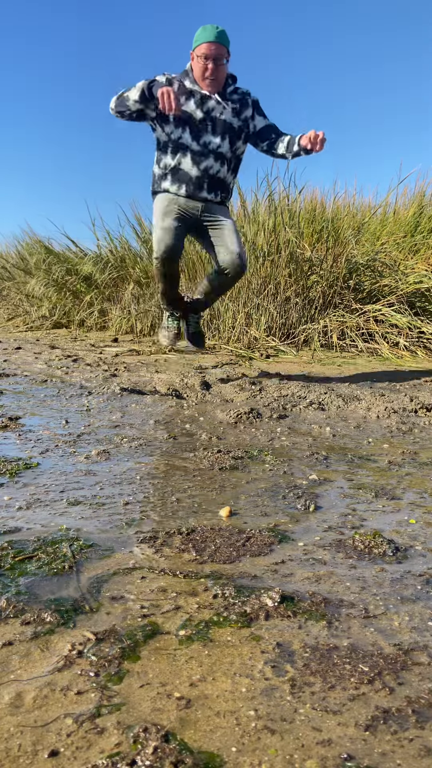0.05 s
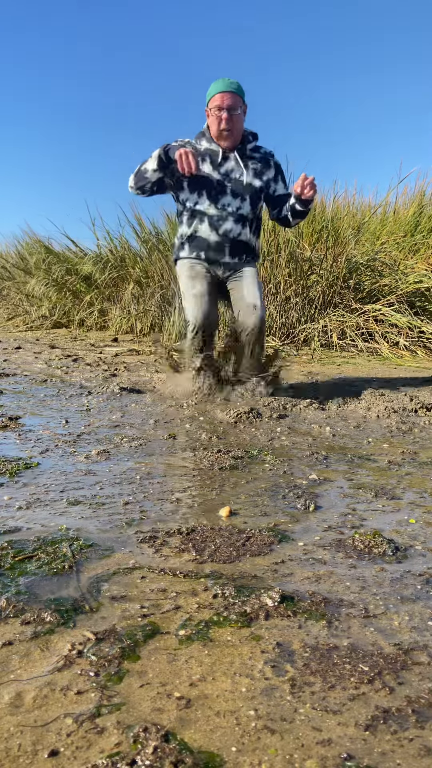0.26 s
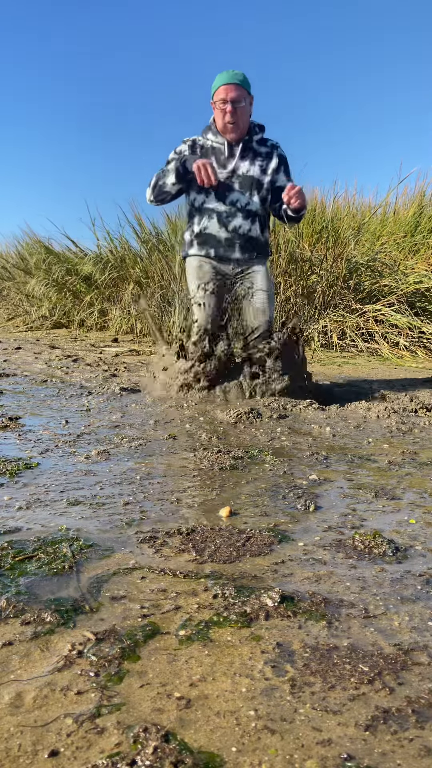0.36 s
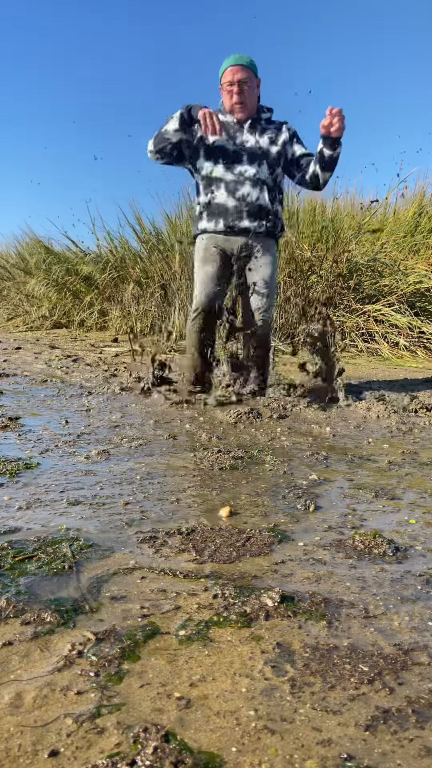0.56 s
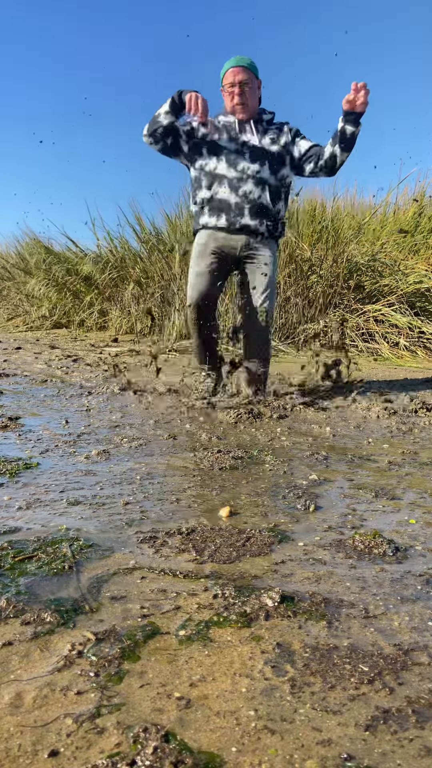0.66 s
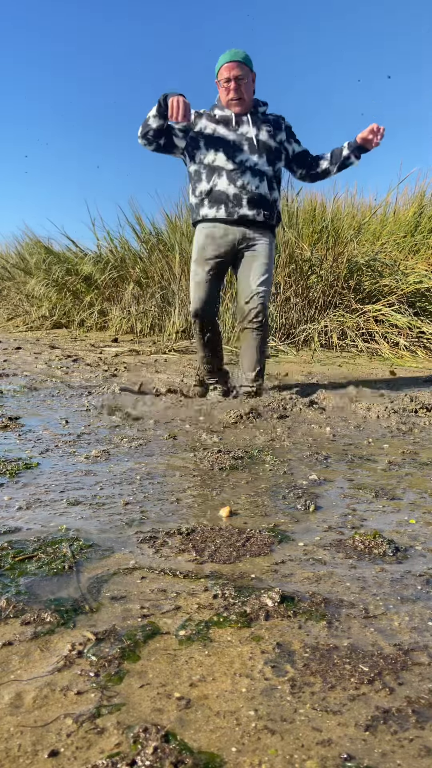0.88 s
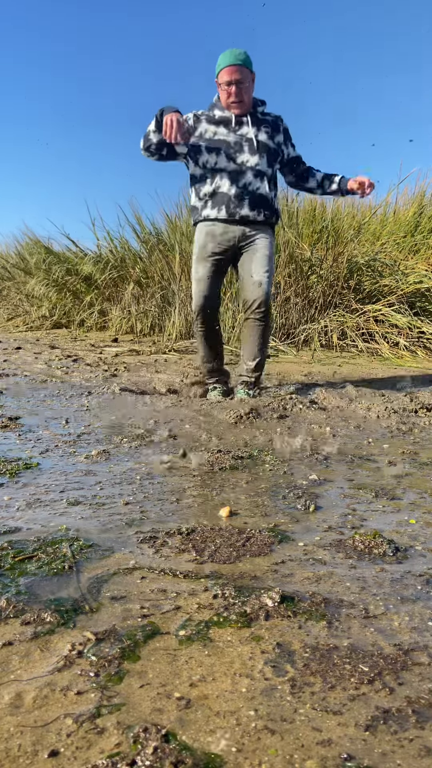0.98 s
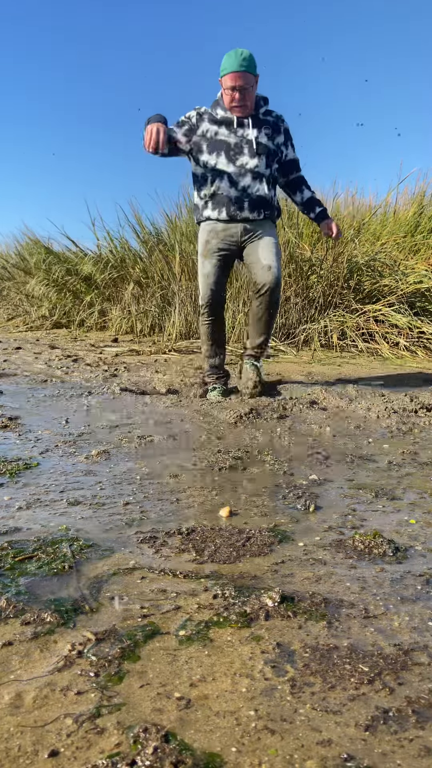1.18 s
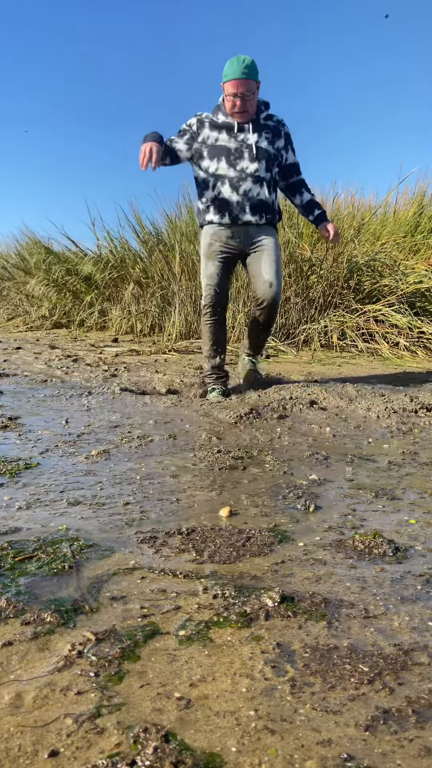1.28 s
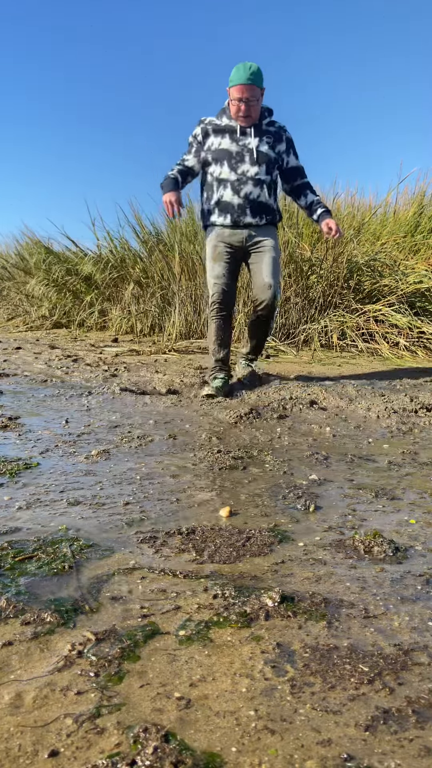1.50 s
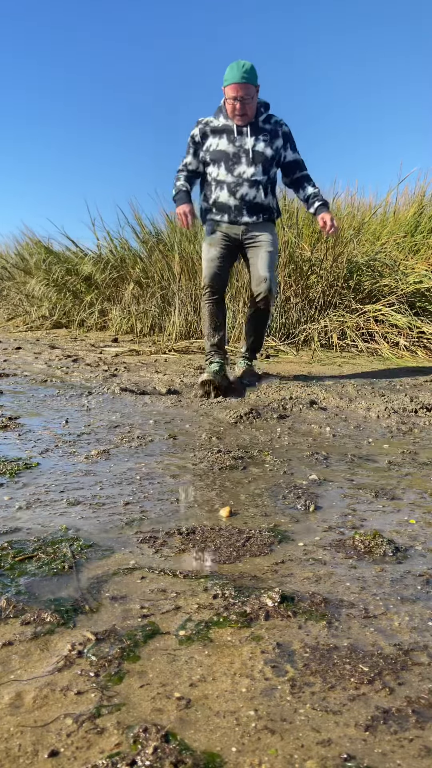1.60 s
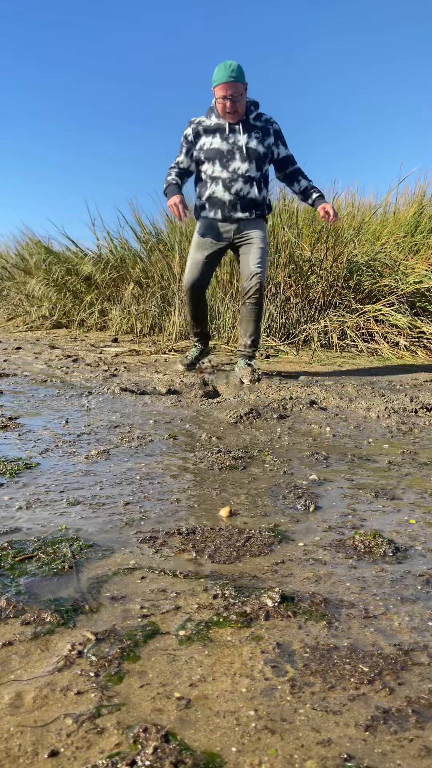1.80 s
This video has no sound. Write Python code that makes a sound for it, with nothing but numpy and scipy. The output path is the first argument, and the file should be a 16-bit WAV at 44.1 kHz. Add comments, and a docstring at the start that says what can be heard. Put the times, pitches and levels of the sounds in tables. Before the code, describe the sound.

Feet slap hard into wet mud, followed by faint spatter and squelching steps.

```python
"""Two feet slap into wet shore mud: a man's jump, a few metres from the microphone.
Each sole cracks the water film, bursts an air pocket and thuds; mud sprays, the soft ground quakes.
Clods and drops patter down, bubbles ring, then the shoes squelch as he pulls free and steps about.
Light wind rumbles on the microphone over the hush of the shore."""
import sys
import numpy as np
from scipy import signal
from scipy.fft import rfft, irfft
from scipy.io import wavfile
from scipy.ndimage import uniform_filter1d

SR = 44100
rng = np.random.default_rng(int(sys.argv[2]) if len(sys.argv) > 2 else 0)


def dump_mix(stems):
    """Bounce the given channels to the path in sys.argv[1] as a 16-bit WAV at rate SR."""
    frames = np.atleast_2d(stems).T  # one column per channel
    limited = np.clip(frames, -1, 1)  # hard clip at full scale
    pcm = np.round(limited * 32767).astype(np.int16)
    wavfile.write(sys.argv[1], SR, pcm)


N = 81585
TIME_S = np.arange(N) / SR

# foot impacts: start_s, crack_db, pocket_delay_s, pocket_rise_s, pocket_db, splash_db
FEET = [(0.2141, -9.5, 0.00163, 0.001, -4, -16.5), (0.2217, -24.5, 0.004376, 0.001, -3.5, -16.5)]
# air pocket under a sole: pitch_hz, relative_db, t60_s
POCKET_MODES = [(379, 0, 0.022), (662, -4.5, 0.013), (1050, -11, 0.0069), (1360, -10.5, 0.01)]
# water film crack, splash, sprayed mud: freq_hz, relative_db
CRACK_SPECTRUM = [(300, -14.5), (1500, 5.5), (2900, 0.5), (4500, -11), (6600, -9), (9200, -25),
                  (10500, -45.5)]
SPLASH_SPECTRUM = [(100, -34.5), (500, 6.5), (1400, -3.5), (2000, -11.5), (2500, -8.5), (3400, -12.5),
                   (7000, -30.5), (9200, -27.5), (10500, -61)]
SPRAY_SPECTRUM = [(100, 2), (450, -6), (800, -14), (1400, -7.5), (2700, -13), (4500, -23), (6700, -19),
                  (9300, -34), (10400, -53)]
# mud sprayed by the landing: time_s, level_db
SPRAY_LEVEL = [(.2, -60), (.213, -42), (.218, -20.5), (.236, -35), (.26, -35), (.29, -43), (.345, -44),
               (.385, -58.5), (.46, -79)]
# ground wobble: time_s, pitch_hz, level_db
QUAKE_TRACK = [(0.249, 45.5, -30.5), (0.288, 43.3, -24.5), (0.31, 49.8, -13.5), (0.337, 41.6, -24),
               (0.361, 54, -16.5), (0.381, 62.8, -33.5), (.5, 62, -46)]

# falling clods: start_s, pitch_hz, plop_db, splat_db
CLODS = [(.509, 1310, -44.5, -50), (0.5639, 1557, -34.5, -38), (0.617, 1300, -46, -41),
         (0.6266, 1300, -34.5, -45.5), (0.6715, 880, -38.5, -45), (0.784, 1453, -39.5, -47),
         (0.7908, 965, -45.5, -39.5)]
# bubbles in the mud: start_s, pitch_hz, level_db
BUBBLES = [(.009, 393, -40.5), (.01, 915, -49), (.26, 467, -35), (0.751, 1340, -45), (.757, 940, -45),
           (.764, 447, -37.5), (0.805, 965, -43.5), (0.8233, 1018, -43.5), (.834, 968, -43.5),
           (.978, 386, -45.5), (1.4338, 596, -46), (1.475, 619, -44.5)]
# single drops: start_s, level_db
DROPS = [(.347, -45), (0.4415, -39), (.554, -45), (0.7244, -47), (0.766, -40), (0.8189, -40),
         (0.8454, -40.5), (0.876, -40), (1.004, -46.5), (1.05, -48.5), (1.076, -47), (1.141, -51.5),
         (1.292, -46)]
# drop impact: freq_hz, relative_db
DROP_SPECTRUM = [(500, 7), (1800, 5.5), (2800, 8), (4500, -2), (6600, -0.5), (9200, -5.5), (10500, -21.5),
                 (12500, -26)]
# fine spatter: time_s, level_db
PATTER_LEVEL = [(0, -90.5), (.128, -58.5), (.17, -68), (.42, -64.5), (.61, -55.5), (.72, -56.5), (.8, -52),
                (.92, -58), (1.06, -58.5), (1.19, -70), (1.3, -54.5), (1.5, -78)]

# shoe suction: start_s, rise_s, decay_s, pitch_hz, cavity_db, crackle_db
SQUELCHES = [(0.763, 0.007, 0.011, 794, -42, -38.5), (1.275, 0.01, 0.014, 568, -44, -41.5),
             (1.328, 0.031, 0.035, 497, -63.5, -50), (1.4078, 0.0015, 0.0036, 553, -46.5, -47),
             (1.442, 0.02, 0.012, 750, -43.5, -45.5), (1.521, 0.0037, 0.012, 522, -43, -81),
             (1.6775, 0.00074, 0.0012, 910, -43.5, -42)]
# wet crackle, oozing mud: freq_hz, relative_db
CRACKLE_SPECTRUM = [(200, -18), (500, -2.5), (1400, 7.5), (3300, 1), (4300, -18.5), (6600, -18),
                    (10500, -59)]
OOZE_SPECTRUM = [(100, -4), (300, 3.5), (480, 5.5), (800, -6), (1400, -3.5), (1900, -10.5), (2500, -6),
                 (3300, -17.5), (7000, -30.5), (10500, -43)]
# ooze round the shoes: time_s, level_db
OOZE_LEVEL = [(0, -56.5), (.14, -51), (.19, -75), (.5, -48.5), (.73, -63.5), (.79, -47.5), (.88, -52),
              (1.15, -56.5), (1.33, -55), (1.66, -57.5), (1.85, -68)]

# wind gusts, shore hush: time_s, level_db
WIND_LEVEL = [(.08, -42), (.18, -45), (.66, -41.5), (.75, -47.5), (.86, -42), (.95, -44.5), (1.05, -38),
              (1.2, -52), (1.27, -43), (1.35, -47.5), (1.85, -46.5)]
HUSH_LEVEL = [(.18, -58.5), (.6, -58), (1.3, -56.5), (1.85, -63)]
# wind rumble, shore hush: freq_hz, relative_db
WIND_SPECTRUM = [(15, -47.5), (35, -12.5), (58, 5), (85, -2.5), (200, -18.5), (1000, -69.5)]
HUSH_SPECTRUM = [(280, 1.5), (500, -3), (2500, -20.5), (3200, -29.5), (4000, -32.5), (7500, -20.5),
                 (11000, -48)]
# microphone pair balance: freq_hz, left_minus_right_db
MIC_BALANCE = [(100, 1), (300, 3), (750, 3), (1100, 3), (1650, 15), (2000, 0), (2500, 0.5), (3600, -7),
               (5500, 2), (8300, -10)]
# microphone pair phase: freq_hz, left_lead_rad
MIC_PHASE = [(0, 1.5), (1550, -0.03), (1810, -4), (2150, -1.71), (3880, -2.5), (4130, -7), (5080, -8),
             (6030, -8.5), (7920, -1.5), (8960, -2.5), (10600, 1.7), (12700, 1.5)]

POCKET_SAG_RATIO, POCKET_SAG_S = 0.12, 0.0027  # pitch starts high, sinks as the pocket widens
THUD_HZ, THUD_DB, THUD_DECAY_S, THUD_LAG_S = 90.7, -20, 0.013, 0.0021
SMACK_RISE_S, PLOP_RISE_S, CAVITY_WIDTH_HZ = 0.00089, 0.002, 284


def landing():
    """Each sole cracks the water film, splashes, bursts an air pocket and thuds into the mud."""
    out = np.zeros(N)
    for start_s, crack_db, delay_s, rise_s, pocket_db, splash_db in FEET:
        out += amp(crack_db) * fizz(CRACK_SPECTRUM) * burst(start_s, 0.00031, 0.0017)
        out += amp(splash_db) * fizz(SPLASH_SPECTRUM) * burst(start_s, 0.0035, 0.0086)
        age_s = np.maximum(TIME_S - start_s - delay_s, 0)
        warped_s = age_s + POCKET_SAG_RATIO * POCKET_SAG_S * (1 - np.exp(-age_s / POCKET_SAG_S))
        for pitch_hz, mode_db, t60_s in POCKET_MODES:
            envelope = burst(start_s + delay_s, rise_s, t60_s / np.log(1000))
            out += amp(pocket_db + mode_db) * np.sin(2 * np.pi * pitch_hz * warped_s) * envelope
        thud_s = np.maximum(age_s - THUD_LAG_S, 0)
        out += amp(THUD_DB) * np.sin(2 * np.pi * THUD_HZ * thud_s) * np.exp(-thud_s / THUD_DECAY_S)
    return out


def spray():
    """Mud thrown out by the landing, as dense grains."""
    gate = (TIME_S > SPRAY_LEVEL[0][0]) & (TIME_S < SPRAY_LEVEL[-1][0])
    return grains(SPRAY_SPECTRUM, rate_per_s=9000) * level(SPRAY_LEVEL) * gate


def quake(fade_s=0.035):
    """Waterlogged ground wobbles after the landing."""
    time_s, pitch_hz, level_db = np.transpose(QUAKE_TRACK)
    cycles = np.cumsum(np.interp(TIME_S, time_s, pitch_hz) * (TIME_S > time_s[0])) / SR
    fade = np.clip((time_s[-1] - TIME_S) / fade_s, 0, 1)
    return amp(np.interp(TIME_S, time_s, level_db)) * np.sin(2 * np.pi * cycles) * fade


def patter(stray_per_s=140, stray_db=-3, ring_s=0.0005):
    """Fine spatter shed in the jump and raining back; larger stray drops ring at random pitches."""
    fine = grains(DROP_SPECTRUM, rate_per_s=1300)
    strays = np.zeros(N)
    for onset in np.flatnonzero(rng.random(N) < stray_per_s / SR):
        age_s = TIME_S[:min(1024, N - onset)]
        gain, pitch_hz = rng.uniform(0.37, 1), rng.uniform(1800, 10500)
        ring = np.sin(2 * np.pi * pitch_hz * age_s) * np.exp(-age_s / ring_s)
        strays[onset:onset + len(ring)] += gain * ring
    return (fine + amp(stray_db) * colour(strays, DROP_SPECTRUM)) * level(PATTER_LEVEL)


def drops(decay_s=0.0039):
    """Single drops smack the wet surface."""
    return sum(amp(level_db) * smack() * burst(start_s, SMACK_RISE_S, decay_s)
               for start_s, level_db in DROPS)


def clods(plop_decay_s=0.0044, splat_decay_s=0.0069):
    """Clods fall back, each with a rising plop and a splat."""
    out = np.zeros(N)
    for start_s, pitch_hz, plop_db, splat_db in CLODS:
        note = cavity_note(start_s, plop_decay_s, pitch_hz, glide_ratio=0.087)
        plop = (note + cavity_noise(pitch_hz, width_hz=400)) / np.sqrt(2)
        out += amp(plop_db) * plop * burst(start_s, PLOP_RISE_S, plop_decay_s)
        out += amp(splat_db) * smack() * burst(start_s, SMACK_RISE_S, splat_decay_s)
    return out


def bubbles(decay_cycles=5.9, rough_db=-5.5):
    """Bubbles ring in the churned mud: rough, slightly falling notes."""
    out = np.zeros(N)
    for start_s, pitch_hz, level_db in BUBBLES:
        decay_s = decay_cycles / pitch_hz
        note = cavity_note(start_s, decay_s, pitch_hz, glide_ratio=-0.04)
        rough = amp(rough_db) * cavity_noise(pitch_hz, CAVITY_WIDTH_HZ)
        out += amp(level_db) * (note + rough) * burst(start_s, PLOP_RISE_S, decay_s)
    return out


def squelches():
    """Mud oozes under the shoes; cavities crackle open as a foot lifts or sinks."""
    out = grains(OOZE_SPECTRUM, rate_per_s=2800) * level(OOZE_LEVEL)
    crackle = steady(grains(CRACKLE_SPECTRUM, rate_per_s=4000), window_samples=140)
    for start_s, rise_s, decay_s, pitch_hz, cavity_db, crackle_db in SQUELCHES:
        suction = amp(cavity_db) * cavity_noise(pitch_hz, CAVITY_WIDTH_HZ)
        out += (suction + amp(crackle_db) * crackle) * burst(start_s, rise_s, decay_s)
    return out


def wind():
    """Gusts rumble on both microphone ports, partly correlated."""
    shared = steady(colour(rng.standard_normal(N), WIND_SPECTRUM), window_samples=1800)
    per_port = steady(colour(rng.standard_normal((2, N)), WIND_SPECTRUM), window_samples=1800)
    return level(WIND_LEVEL) * (amp(-4.5) * shared + amp(-1.5) * per_port)


def shore_hush():
    """Faint stereo noise of the open shore."""
    return level(HUSH_LEVEL) * colour(rng.standard_normal((2, N)), HUSH_SPECTRUM)


def at_microphones(source, scatter_db=-14, highpass_hz=900):
    """Direct sound with its own colour and phase per port, plus scatter off ground and reeds."""
    freq_hz = np.fft.rfftfreq(2 * N, 1 / SR)
    balance = amp(log_interp(MIC_BALANCE, freq_hz))
    half_lead = np.exp(0.5j * log_interp(MIC_PHASE, freq_hz))
    ports = np.array([balance * half_lead, 1 / half_lead]) * np.sqrt(2 / (1 + balance ** 2))
    direct = irfft(rfft(source, 2 * N) * ports, 2 * N)[:, :N]
    tail = rng.standard_normal((2, N)) * burst(start_s=0.0018, rise_s=0.0049, decay_s=0.02)
    tail = signal.sosfilt(signal.butter(1, highpass_hz, "high", fs=SR, output="sos"), tail)
    tail *= amp(scatter_db) / np.linalg.norm(tail[0])
    return direct + signal.fftconvolve(source[None], tail, axes=1)[:, :N]


def grains(spectrum, rate_per_s, spread_db=3.5):
    """Tiny bursts of wet film, random in time and size."""
    size = amp(spread_db * np.minimum(rng.exponential(1, N), 4))
    polarity = rng.choice([-1, 1], N)
    hits = rng.random(N) < rate_per_s / SR
    return colour(size * polarity * hits, spectrum)


def fizz(spectrum):
    """Grains dense enough to merge."""
    return steady(grains(spectrum, rate_per_s=12000), window_samples=300)


def smack(spread_db=2.5):
    """Wet fizz of one drop, with random spectral peaks."""
    freq_hz = np.linspace(DROP_SPECTRUM[0][0], DROP_SPECTRUM[-1][0], num=24)
    uneven_db = log_interp(DROP_SPECTRUM, freq_hz) + spread_db * rng.standard_normal(len(freq_hz))
    return fizz(np.transpose([freq_hz, uneven_db]))


def cavity_note(start_s, decay_s, pitch_hz, glide_ratio):
    """Gliding tone of a collapsing cavity; passes pitch_hz one decay time in."""
    age_s = TIME_S - start_s
    glide_hz = pitch_hz * (1 + glide_ratio * np.tanh(age_s / decay_s - 1))
    return np.sqrt(2) * np.sin(2 * np.pi * np.cumsum(glide_hz * (age_s > 0)) / SR)


def cavity_noise(pitch_hz, width_hz):
    """Turbulence ringing in a soft mud cavity."""
    detuning = (np.fft.rfftfreq(N, 1 / SR) - pitch_hz) / width_hz
    ring = irfft(rfft(rng.standard_normal(N)) / (1 + 1j * detuning) ** 2, N)
    return steady(ring, window_samples=400)


def burst(start_s, rise_s, decay_s):
    """Envelope: smooth rise, exponential fall."""
    age_s = TIME_S - start_s
    attack = np.sin(np.pi / 2 * np.clip(age_s / rise_s, 0, 1)) ** 2
    return attack * np.exp(-np.maximum(age_s - rise_s, 0) / decay_s)


def colour(x, spectrum):
    """Filter by a spectrum, then scale to rms 1."""
    gain = amp(log_interp(spectrum, np.fft.rfftfreq(N, 1 / SR)))
    shaped = irfft(rfft(x) * gain, N)
    return shaped / np.sqrt(np.mean(shaped ** 2) + 1e-20)


def steady(x, window_samples):
    """Divide by the running rms."""
    return x / np.sqrt(abs(uniform_filter1d(x ** 2, window_samples)) + 1e-9)


def log_interp(points, freq_hz):
    """Interpolate a table over log frequency."""
    knots_hz, values = np.transpose(points)
    return np.interp(np.log(freq_hz + 1), np.log(knots_hz + 1), values)


def level(points):
    """Gain curve from time_s, level_db points."""
    return amp(np.interp(TIME_S, *np.transpose(points)))


def amp(level_db):
    """Decibels to gain."""
    return 10 ** (np.asarray(level_db) / 20)


def scene():
    """Mud sounds from one spot, plus ground wobble, wind and hush."""
    mud = spray() + landing() + patter() + drops() + clods() + bubbles() + squelches()
    return at_microphones(mud) + quake() + wind() + shore_hush()


def record(dry, ceiling=0.92, cutoff_hz=12900):
    """Soft peak limiter, then low-pass."""
    limited = dry / (1 + (dry / ceiling) ** 8) ** (1 / 8)
    lowpass = signal.firwin(511, cutoff_hz, window=("kaiser", 9), fs=SR)
    return signal.oaconvolve(limited, lowpass[None], "same")


dry = scene()
out = record(dry)
dump_mix(out)
```